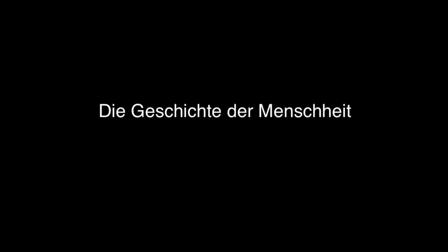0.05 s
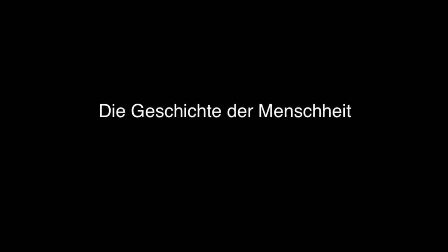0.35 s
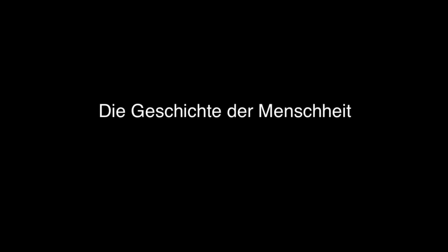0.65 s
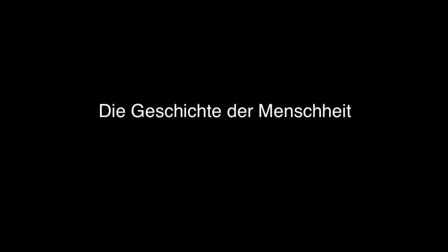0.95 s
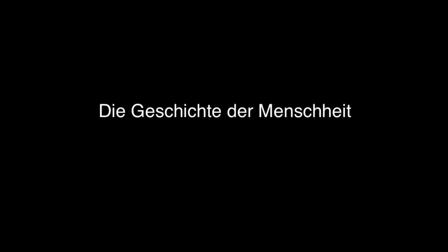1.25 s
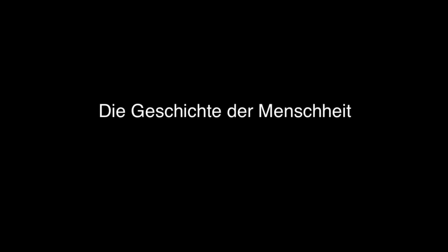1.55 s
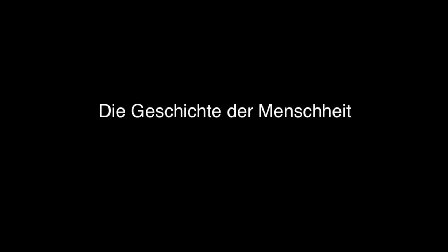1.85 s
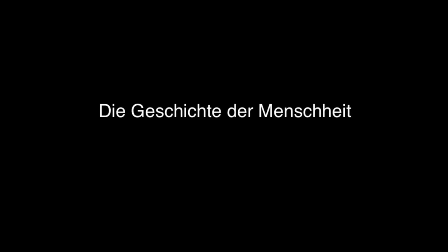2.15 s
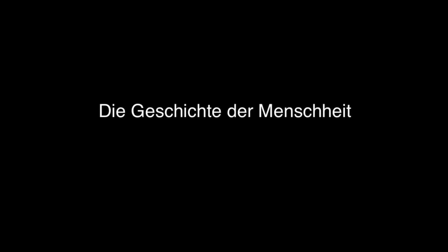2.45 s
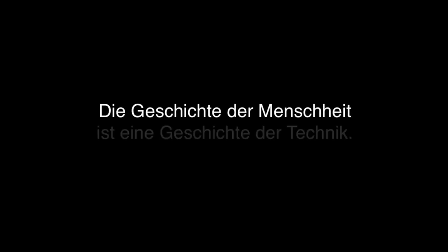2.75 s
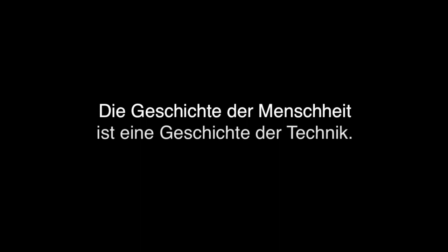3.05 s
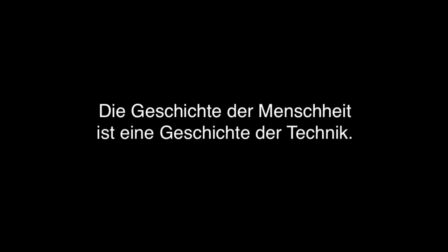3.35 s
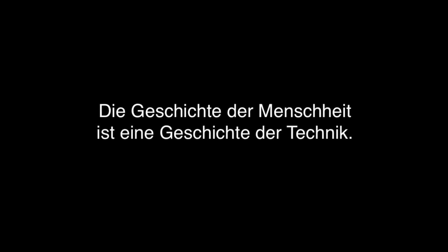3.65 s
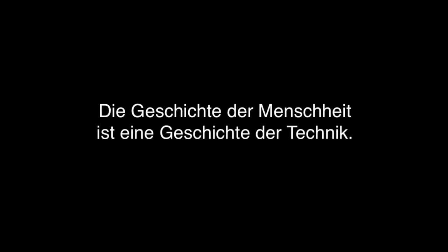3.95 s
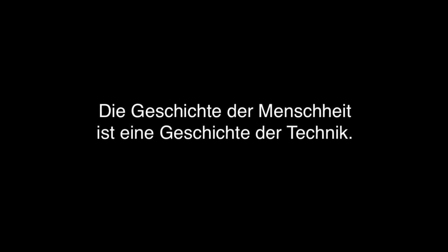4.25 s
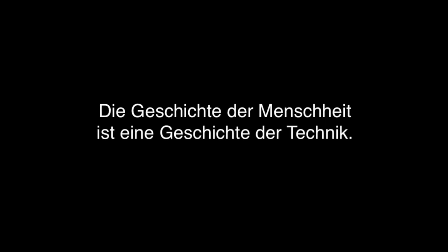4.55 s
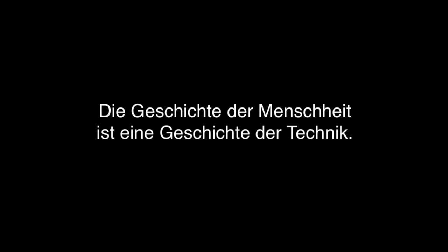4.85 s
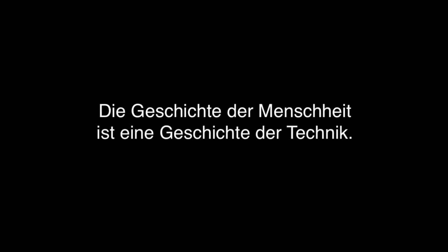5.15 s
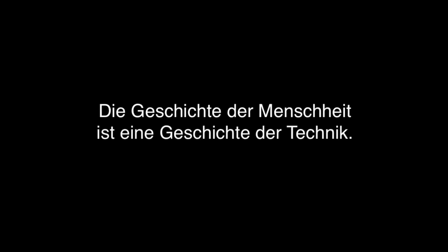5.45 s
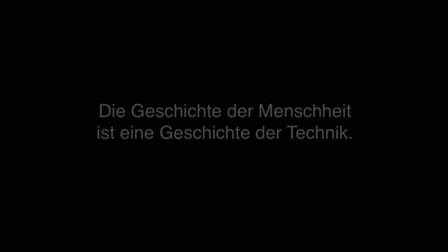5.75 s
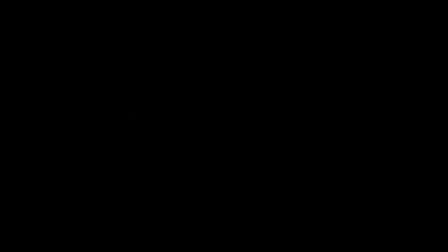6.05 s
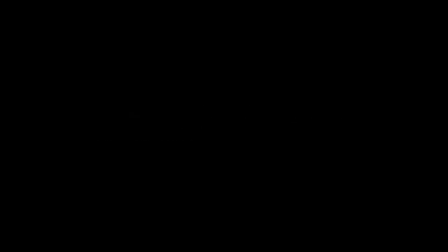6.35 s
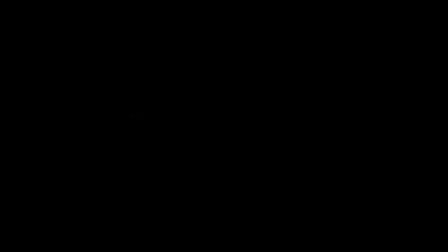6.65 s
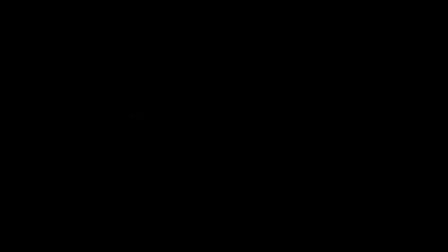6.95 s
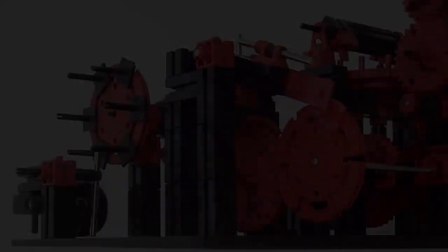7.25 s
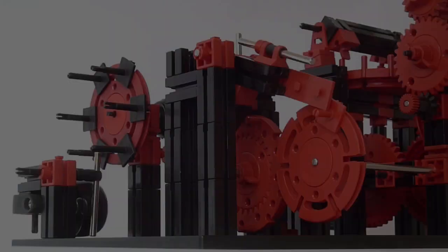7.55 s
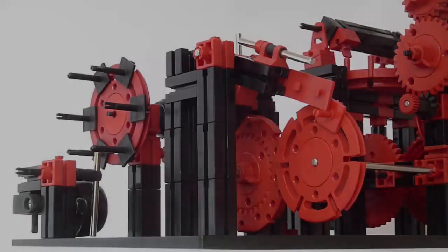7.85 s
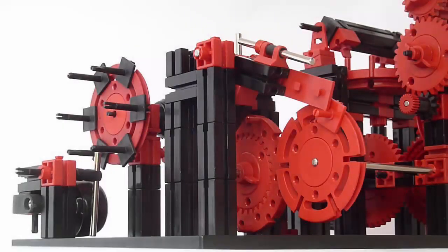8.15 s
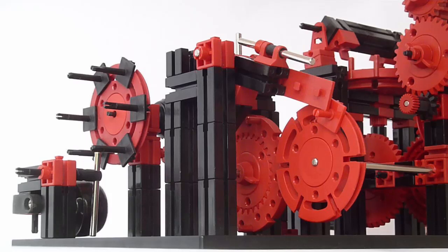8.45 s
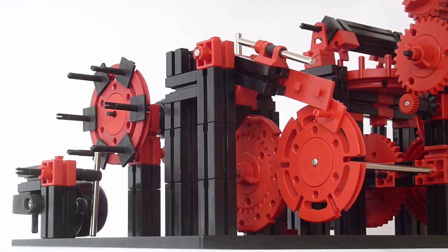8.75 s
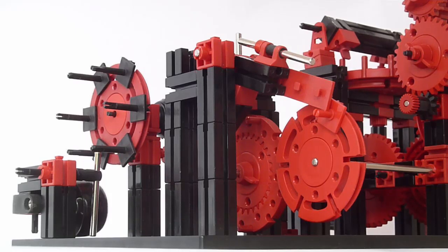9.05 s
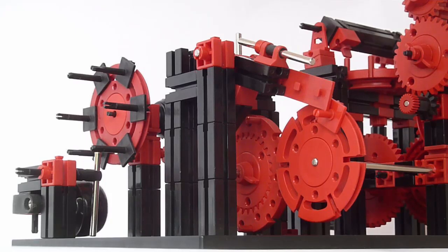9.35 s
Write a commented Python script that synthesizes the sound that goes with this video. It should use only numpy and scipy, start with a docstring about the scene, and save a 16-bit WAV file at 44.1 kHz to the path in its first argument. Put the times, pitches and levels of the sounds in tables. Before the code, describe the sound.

A model clock made of plastic parts beats slowly and evenly, close to the microphone in a quiet room. A heavy clicking clunk rings through its body with a tiny rebound, then a lighter tick answers about 0.7 seconds later. The two keep alternating, and after about three seconds a few soft, dull bumps fall between them. A low rumble, faint hum and hiss lie underneath.

```python
"""A model tower clock made of plastic parts beats slowly, close by in a quiet room.
From the start there is a low rumble, a faint hum and hiss, and the frame rings from a heavy beat.
In each heavy beat a tooth of the wheel snaps off its catch (the pallet), the wheel drops against
the frame, and a loose part bounces back. About 0.7 s later comes the return beat, a light tick.
The two keep taking turns, and from about 3 s on a few soft bumps fall between them."""
import sys
import numpy as np
from scipy import signal
from scipy.fft import rfft, irfft, next_fast_len
from scipy.io import wavfile
from scipy.ndimage import map_coordinates

SR = 44100
rng = np.random.default_rng(int(sys.argv[2]) if len(sys.argv) > 2 else 0)


def digitize_waveform(pressure):
    """Quantize a signal to 16-bit integers and store it at the path in sys.argv[1].

    Rows of a 2-D input are taken as channels; values are limited to [-1, 1].
    """
    field = np.atleast_2d(pressure).T
    bounded = np.clip(field, -1, 1)
    quanta = np.round(bounded * 32767).astype(np.int16)
    wavfile.write(sys.argv[1], SR, quanta)


N = 414540

# The room's deep rumble: pitch_hz, level_db
RUMBLE_SPECTRUM = [(10, -25), (19, -8.5), (24.5, 12), (29, -8.5), (38, -16), (55, -24), (90, -80)]
# How the rumble slowly rises and falls: time_s, level_db
RUMBLE_SWELLS = [(0, -45.5), (0.75, -37.5), (1.15, -44.5), (2.35, -52), (2.7, -40.5), (3.4, -42.5),
                 (4.75, -34.5), (5.1, -41), (6.9, -42), (7.95, -54.5), (9.05, -41.5), (9.4, -51)]
# The low drone: pitch_hz, level_db
DRONE_SPECTRUM = [(35, -38), (49, -22), (57, 4.5), (66, -8), (90, -37), (150, -73)]
# The soft rush of room air: pitch_hz, level_db
AIR_SPECTRUM = [(40, -8), (80, 0), (130, -1.5), (190, -1.5), (250, -7), (320, -10.5), (450, -16.5),
                (700, -21.5), (1200, -33), (2500, -44.5), (6000, -57)]
# How alike the air sounds left and right (1 = the same): pitch_hz, likeness
AIR_LIKENESS = [(60, 0.39), (170, 0.54), (350, 0.14), (800, 0.066)]
# The hiss: pitch_hz, level_db
HISS_SPECTRUM = [(500, -8), (1250, 1.5), (1650, 6.5), (2100, 2), (2600, -2), (3300, -1), (4000, 1.5),
                 (4700, -2.5), (5450, -6.5), (6500, 0.5), (7400, -2.5), (9500, 0), (12500, -0.5),
                 (16000, -1)]
# Soft bumps between the beats: start_s, level_db, pitch_hz, fade_s
SOFT_BUMPS = [(3.085, -55, 300, 0.04), (4.672, -54.5, 300, 0.028), (6.408, -47, 268, 0.096),
              (9.141, -42, 140.7, 0.5), (9.2, -56.5, 280, 0.16)]
# The tones in one bump: pitch_ratio, level_db
BUMP_TONES = [(.86, 0), (1, 1.5), (1.2, -6.5), (1.42, -10.5)]
# The ringing of case and room: pitch_hz, level_db
RING_SPECTRUM = [(85, -25), (130, -9), (200, 1), (330, 7), (450, -7.5), (620, -18), (760, -9), (950, -15),
                 (1150, -8.5), (1350, -19.5), (1570, -6), (2150, -19), (2450, -26.5), (9000, -37)]
# How long that ringing lasts: pitch_hz, fade_s
RING_FADES = [(120, 0.96), (300, 0.71), (700, 0.76), (1700, 0.4), (3000, 0.45), (9000, 0.42)]
# How alike it sounds left and right: pitch_hz, likeness
RING_LIKENESS = [(300, 0.9), (700, 0.84), (1300, 0.097), (3000, 0.052)]
# The natural tones of the frame and its base: pitch_hz, heavy_beat_db, return_beat_db, fade_s
FRAME_TONES = [(120.8, -36, -47.5, 0.48), (179.7, -36, -55, 0.39), (241.2, -46, -60, 0.68),
               (267.3, -42.5, -55, 0.88), (278.4, -43, -53, 0.42), (305.3, -42.5, -51, 0.6),
               (329.6, -39, -51, 0.25), (356.3, -42.5, -58, 0.42), (399, -47.5, -63, 0.57),
               (428, -68, -60.5, 0.71), (486, -58.5, -66.5, 0.54), (508, -63.5, -66, 0.56),
               (576, -73, -68.5, 0.75), (598, -51, -65, 0.56), (691, -48.5, -72, 0.25),
               (695, -48, -63, 0.3), (724, -47.5, -76, 0.21), (781, -59, -78, 0.86), (827, -55, -62, 0.32),
               (871, -56.5, -71, 0.44), (1049, -64.5, -71, 0.86), (1128, -60.5, -70, 0.75),
               (1168, -64, -76, 0.71), (1143, -52.5, -65, 0.45), (1531, -49, -76, 0.36),
               (1595, -61, -86, 0.58), (1615, -69, -78, 0.13), (1673, -54, -81, 0.27),
               (1770, -64, -83, 0.37), (2206, -63, -85, 0.48)]
# The tones of wheel and pallets: pitch_hz, width_hz, heavy_beat_db, return_beat_db
PALLET_TONES = [(1460, 390, -8.5, -8), (3070, 390, -18.5, -11), (4020, 200, -21, -10),
                (5070, 640, -16.5, -11), (6600, 240, -9.5, -5), (7580, 360, -8, -0.5), (8200, 260, -1.5, 0),
                (9080, 330, 4, -2), (9650, 320, -5, -4), (10700, 480, -8.5, -8)]
# The sharp edge of a click: pitch_hz, width_hz, level_db
SNAP_TONES = [(12340, 860, 3), (14350, 980, -5)]
# The frame's short answer to a return beat: pitch_hz, width_hz, level_db
TAP_TONES = [(300, 68, 5), (700, 250, -11), (1100, 130, -11)]
# Short tones as the wheel lands: pitch_hz, width_hz, level_db
LANDING_TONES = [(248, 104, 18), (780, 150, 5.5), (1424, 110, 3.5), (2225, 137, 0), (2700, 250, -13),
                 (4020, 340, -4.5), (4760, 430, -9.5), (8100, 350, -16), (9600, 1300, -23)]
# The light ticks: start_s, click_db, snap_db (added to click_db), knock_db
RETURN_BEATS = [(0.618, -56, -9, -50), (2.0756, -51.5, 6, -48.5), (3.559, -50, -3, -49.5),
                (5.002, -59.5, -4, -49), (6.4748, -51.5, 6, -51.5), (7.8954, -55, -7, -49),
                (9.3786, -53, -3, -51)]
# The heavy beats: start_s, click_db, snap_db (as above), knock_db, boom_db, bounce_delay_s, bounce_db
HEAVY_BEATS = [(-0.035, -33, -8, -37, -52, 0.046, -54.5), (1.3895, -37.5, -11, -39, -38, 0.066, -59),
               (2.844, -41, -7.4, -39, -38.5, 0.070, -63), (4.3325, -39.5, -13, -38, -34.5, 0.066, -52),
               (5.7497, -43, -16, -37, -38.5, 0.063, -58), (7.2732, -42, -21, -40.5, -55, 0.056, -63),
               (8.7402, -39, -16.5, -41, -49.5, 0.062, -54.5)]

T = np.arange(SR) / SR  # the second that follows a blow
DROP_S = 0.007  # from a tooth letting go to the wheel landing
BOOM_HZ, BOOM_FADE_S, BOOM_RISE_S = 128.3, 1.8, 0.041  # every fade time is for a fall of 60 dB
FIRM_BOOM_DB = -47  # the boom of an ordinary firm landing
HARDNESS_PER_DB, BASE_PER_DB = 0.11, 0.22  # extra dB in the upper and lowest tones per dB of boom
DRONE_DB, DRONE_SWELL_SHARE = -52, 0.65
FLUTTER_DB, FLUTTER_PER_S = 1.5, 7  # quick random wavering of rumble and drone


def amp(db):
    """Turn decibels into a number to multiply by."""
    return 10 ** (np.asarray(db) / 20)


def normalize(x, span_s=None):
    """Scale x to an average (rms) level of 1, overall or over its first span_s."""
    head = x if span_s is None else x[..., :int(span_s * SR)]
    return x / np.sqrt(np.mean(head ** 2) + 1e-20)


def look_up(table, hz):
    """Read a table's value at any pitch, gliding between its rows."""
    pitches, values = np.transpose(table)
    return np.interp(np.log(hz + 1), np.log(pitches), values)


def filtered(x, response):
    """Multiply each frequency in x by response(hz)."""
    size = x.shape[-1]
    padded = next_fast_len(size + 8192)
    hz = np.fft.rfftfreq(padded, 1 / SR)
    return irfft(rfft(x, padded) * response(hz), padded)[..., :size]


def noise(spectrum, likeness, size=N):
    """Stereo noise, mixed from a part both sides share and a part that sets them apart."""
    def response(hz):
        angle = np.arccos(np.clip(look_up(likeness, hz), -1, 1)) / 2
        return amp(look_up(spectrum, hz)) * np.array([np.cos(angle), np.sin(angle)])
    mid, side = filtered(rng.standard_normal((2, size)), response)
    return normalize(np.array([mid + side, mid - side]))


def wobble(per_s):
    """A smooth curve through per_s random points each second."""
    points = rng.standard_normal(int(N * per_s / SR) + 4)
    return map_coordinates(points, [np.arange(N) * per_s / SR])


def pan(right_db):
    """Left and right gains that make the right side louder by right_db."""
    return amp([[-right_db / 2], [right_db / 2]])


def add(track, start_s, sound):
    """Mix a sound in at start_s, cutting off what falls outside the track."""
    start = round(start_s * SR)
    part = sound[..., max(-start, 0):N - start]
    track[:, max(start, 0):max(start, 0) + part.shape[-1]] += part


def resonate(x, tones):
    """Let x set tones ringing; the wider a tone, the sooner it dies."""
    def response(hz):
        return sum((-1) ** k * amp(db) * 1j * hz * width / (pitch ** 2 - hz ** 2 + 1j * hz * width)
                   for k, (pitch, width, db) in enumerate(tones))
    return normalize(filtered(x, response), span_s=.005)


def room_background():
    """A swelling rumble, a drone that swells with it, a wavering hum, room air and steady hiss."""
    t = np.arange(N) / SR
    swell_db = np.interp(t, *np.transpose(RUMBLE_SWELLS))
    drone_db = DRONE_DB + DRONE_SWELL_SHARE * (swell_db - swell_db.mean())
    rumble_gain = amp(swell_db + FLUTTER_DB * wobble(FLUTTER_PER_S))
    rumble = rumble_gain * noise(RUMBLE_SPECTRUM, likeness=[(30, .92)])
    drone_gain = amp(drone_db + FLUTTER_DB * wobble(FLUTTER_PER_S))
    drone = drone_gain * noise(DRONE_SPECTRUM, likeness=[(60, 0.72)])
    hum_gain = amp(-56 + 2.8 * wobble(7.7)) * np.sqrt(2)
    hum = hum_gain * np.sin(2 * np.pi * 200.5 * t + 0.39 * wobble(6))
    air = amp(-52) * noise(AIR_SPECTRUM, AIR_LIKENESS)
    hiss = amp(-62) * noise(HISS_SPECTRUM, likeness=[(1000, 0.0074)]) * pan(0.76)
    return rumble + drone + hum + air + hiss


def soft_bumps():
    """Dull knocks with no click: a few close tones that die away quickly."""
    out = np.zeros((2, N))
    rise = 1 - np.exp(-T / 0.0084)
    for start_s, level_db, hz, fade_s in SOFT_BUMPS:
        tones = sum(amp(db) * np.sin(2 * np.pi * hz * ratio * T) for ratio, db in BUMP_TONES)
        thud = normalize(tones * rise * amp(-60 * T / fade_s), span_s=0.073)
        add(out, start_s, amp(level_db) * thud)
    return out


def dense_ring():
    """Countless small tones and wall echoes blur together; the high ones die first."""
    hz, t, bands = signal.stft(noise(RING_SPECTRUM, RING_LIKENESS, size=SR), SR, nperseg=512)
    fade = amp(-60 * t / look_up(RING_FADES, hz)[:, None])
    tail = signal.istft(bands * fade, SR, nperseg=512)[1][:, :SR]
    placed = filtered(tail, lambda f: pan(3) ** np.clip(f / 1200, 0, 1))  # highs lean right
    return normalize(placed, span_s=.1)


def frame_knock(levels_db, case, hard_db, case_db, room_db):
    """A blow rings the frame's tones, a little differently each time, along with case and room."""
    hz, _, _, fade_s = np.transpose(FRAME_TONES)
    order = np.arange(len(hz))
    gains = amp(levels_db + 0.88 * rng.standard_normal(len(hz))) * (-1) ** order
    # short waves reach left and right out of step
    phase = np.clip(hz / 1500, 0, 1) ** 2 * 0.92 * (-1) ** (order // 2)
    fading_waves = np.exp((2j * np.pi * hz - np.log(1000) / fade_s)[:, None] * T)
    tones = np.imag((gains * np.exp(1j * np.array([phase, -phase]))) @ fading_waves)
    ring = normalize(tones, span_s=0.13) + amp(case_db) * case + amp(room_db) * dense_ring()
    # a harder landing puts more into the upper tones
    ring = filtered(ring, lambda f: amp(hard_db * np.clip(f / 350 - 1, 0, 1)))
    rise = 1 - np.exp(-T / 0.00039)
    return normalize(ring * rise, span_s=0.11)


def contact(fade_s, room_db, push):
    """Two parts meet: a sudden push, a brief scrape, then faint echoes."""
    scrape = normalize(rng.standard_normal(SR) + 1.17 * rng.standard_normal((2, SR)))
    echoes = amp(room_db - 60 * T / .25) * (1 - np.exp(-T / .005))
    return push * (T == 0) + scrape * (amp(-60 * T / fade_s) + echoes)


def click(force, tones):
    """A contact rings wheel and pallet; they sit to the right, so the left hears them later."""
    delay_s = np.array([[.00004], [0]])
    ring = resonate(force, tones)
    return filtered(ring, lambda hz: np.exp(-2j * np.pi * hz * delay_s)) * pan(8.4)


def snap(fade_s):
    """The brief, very bright edge of a hard contact."""
    edge = resonate(contact(fade_s, room_db=-30, push=4.2), SNAP_TONES)
    return filtered(edge, lambda hz: 1 / (1 + (10500 / (hz + 1)) ** 12)) * pan(5)  # highs only


def return_beats(case):
    """The light tick: one sharp contact that barely shakes the frame."""
    out = np.zeros((2, N))
    pallet = [(hz, width, db) for hz, width, _, db in PALLET_TONES]
    frame_db = np.array(FRAME_TONES)[:, 2]
    rise = 1 - np.exp(-T / 0.0021)
    for start_s, click_db, snap_db, knock_db in RETURN_BEATS:
        touch = contact(fade_s=0.013, room_db=-23, push=3.4)
        tick = click(touch, pallet) + amp(snap_db) * snap(fade_s=.008)
        add(out, start_s, amp(click_db) * tick)
        ring = frame_knock(frame_db, case, hard_db=-2, case_db=-5, room_db=-13.5) * rise
        add(out, start_s, amp(knock_db) * (ring + resonate(touch, TAP_TONES)))
    return out


def heavy_beats(case):
    """A tooth clicks free, the wheel lands on the other pallet with a boom, and a loose part bounces."""
    out = np.zeros((2, N))
    pallet = [(hz, width, db) for hz, width, db, _ in PALLET_TONES]
    boom_shape = amp(-60 * T / BOOM_FADE_S) * (1 - np.exp(-T / BOOM_RISE_S))
    boom = -np.sin(2 * np.pi * BOOM_HZ * T) * boom_shape * np.clip(8 * (1 - T), 0, 1)
    for start_s, click_db, snap_db, knock_db, boom_db, bounce_delay_s, bounce_db in HEAVY_BEATS:
        # the tooth drags over the pallet's edge for a moment, then lets go
        drag = contact(fade_s=0.024, room_db=-21, push=1) * np.where(T < .003, 1, amp(-5))
        release = click(drag, pallet) + amp(snap_db) * snap(fade_s=.014)
        add(out, start_s, amp(click_db) * release)
        # a beat that booms lands harder and also shakes the base's lowest tone more
        force_db = boom_db - FIRM_BOOM_DB
        hard_db = HARDNESS_PER_DB * force_db
        frame_db = np.array([db + (hz < 150) * BASE_PER_DB * force_db for hz, db, _, _ in FRAME_TONES])
        landing = resonate(contact(fade_s=0.023, room_db=-15, push=8.8), LANDING_TONES) * pan(1.2)
        blow = amp(2.5) * landing + frame_knock(frame_db, case, hard_db, case_db=-6, room_db=-13)
        add(out, start_s + DROP_S, amp(knock_db) * blow + amp(boom_db) * boom)
        bounce = click(contact(fade_s=0.013, room_db=-32, push=5), pallet)
        add(out, start_s + bounce_delay_s, amp(bounce_db) * bounce)
    return out


def scene():
    """The clock in its room; both kinds of beat shake the same case."""
    case = dense_ring()
    return heavy_beats(case) + return_beats(case) + soft_bumps() + room_background()


def record(dry):
    """Cut away the very highest treble."""
    return filtered(dry, lambda hz: hz < 15900)


dry = scene()
out = record(dry)
digitize_waveform(out)
```